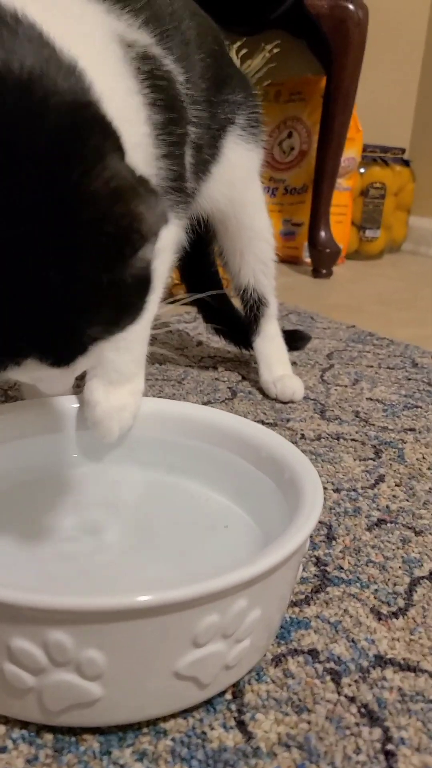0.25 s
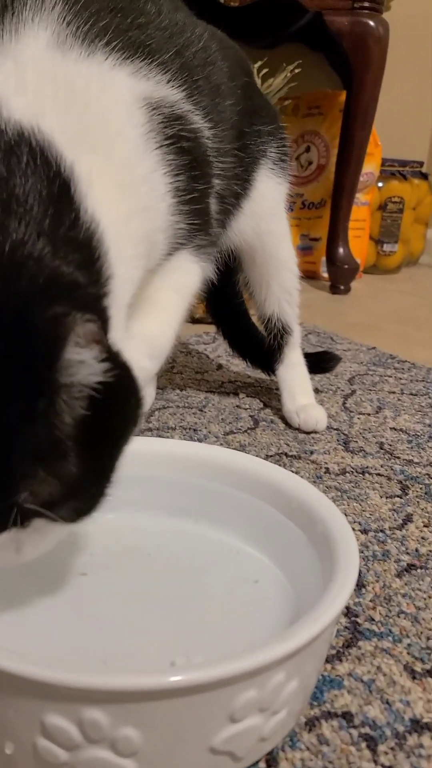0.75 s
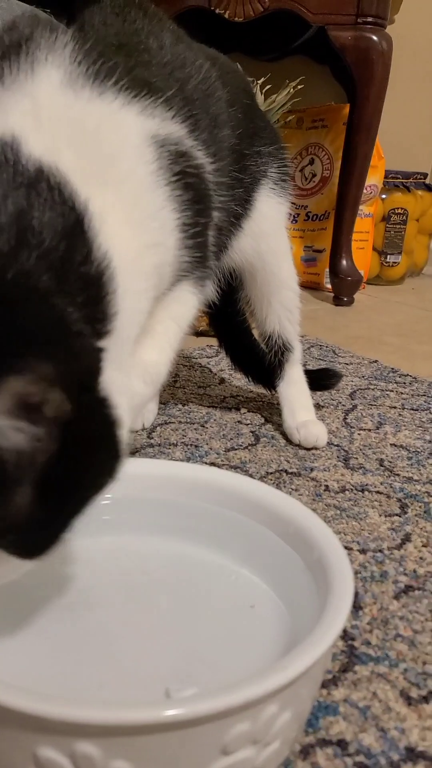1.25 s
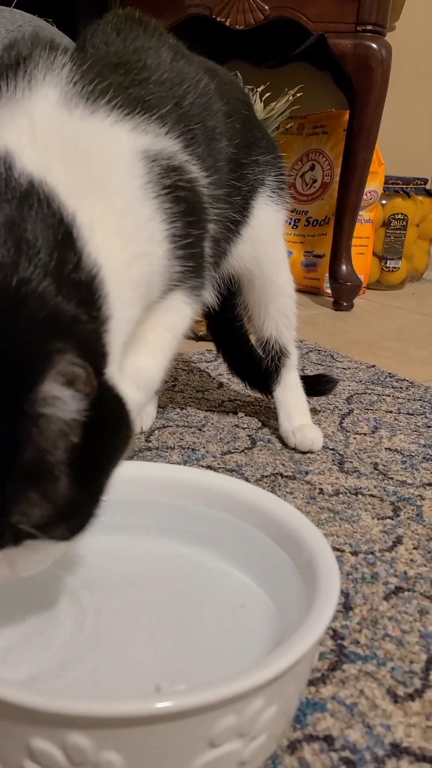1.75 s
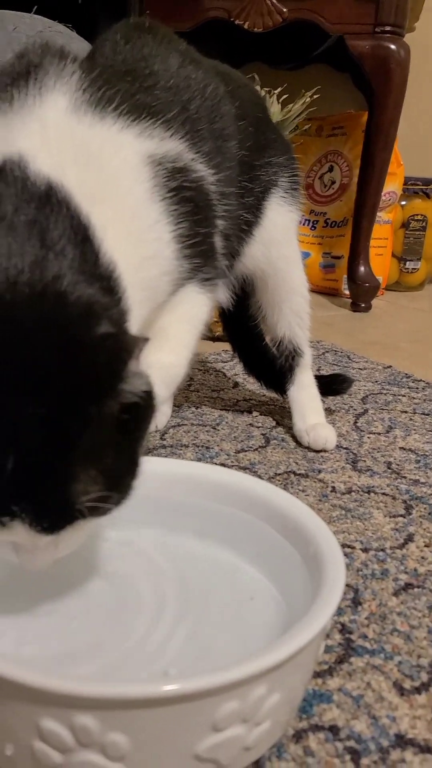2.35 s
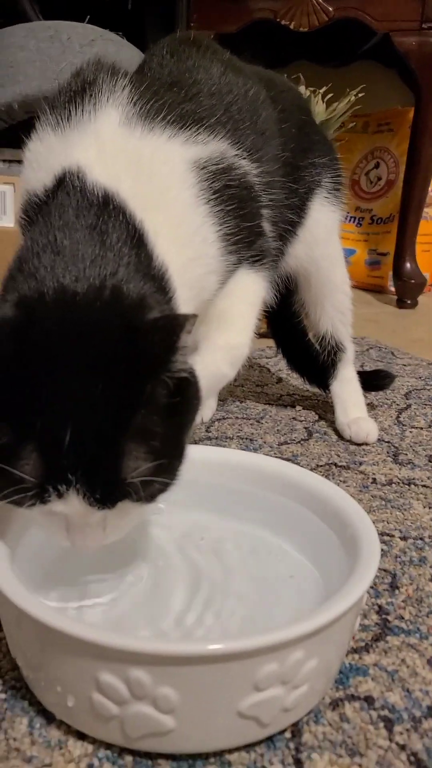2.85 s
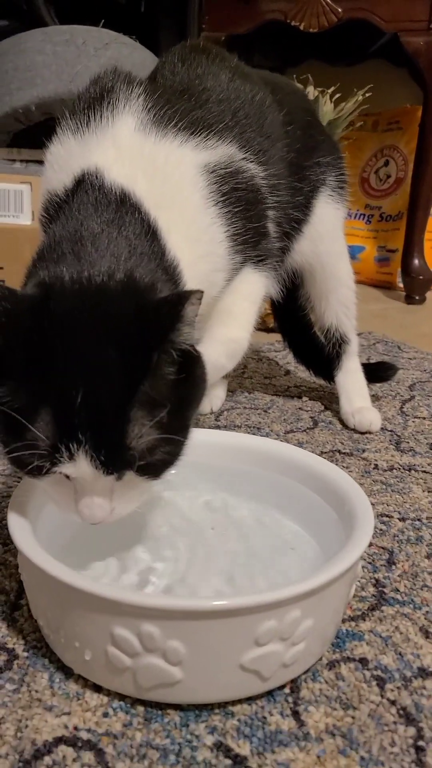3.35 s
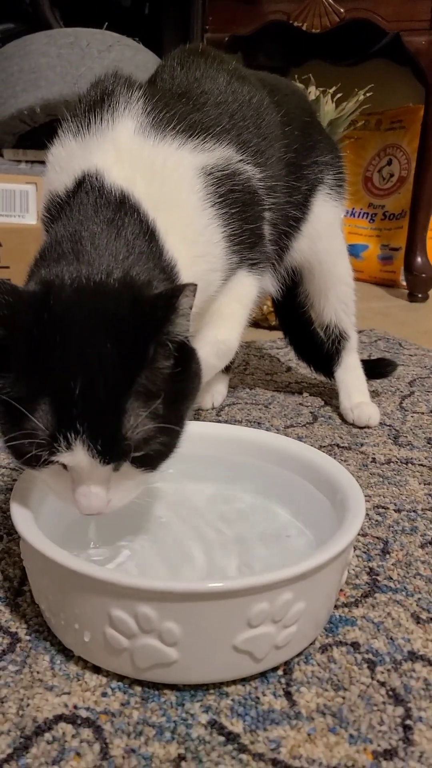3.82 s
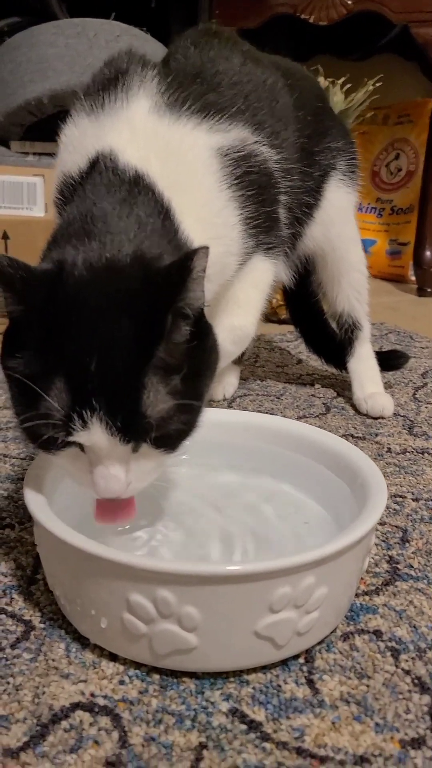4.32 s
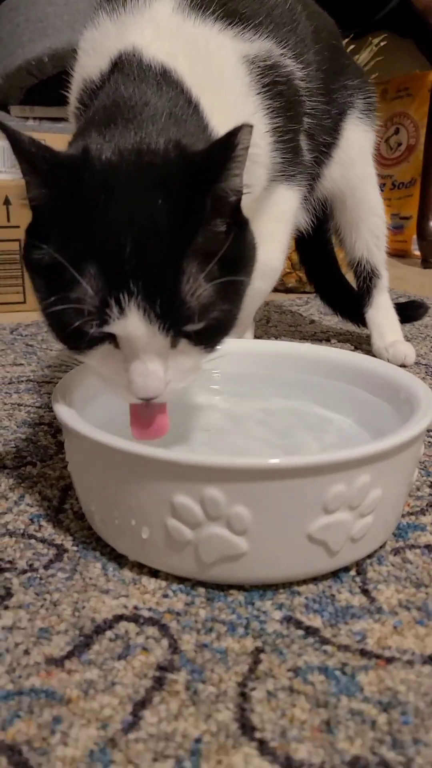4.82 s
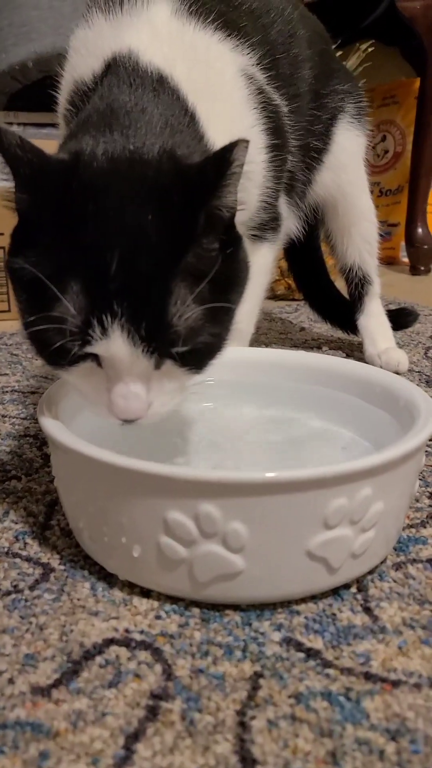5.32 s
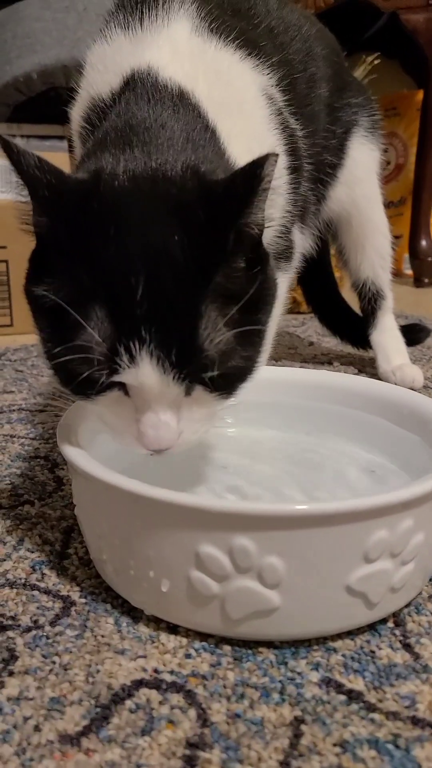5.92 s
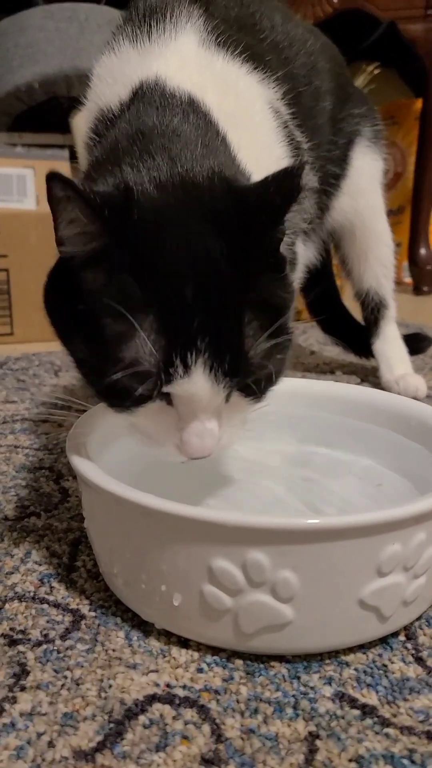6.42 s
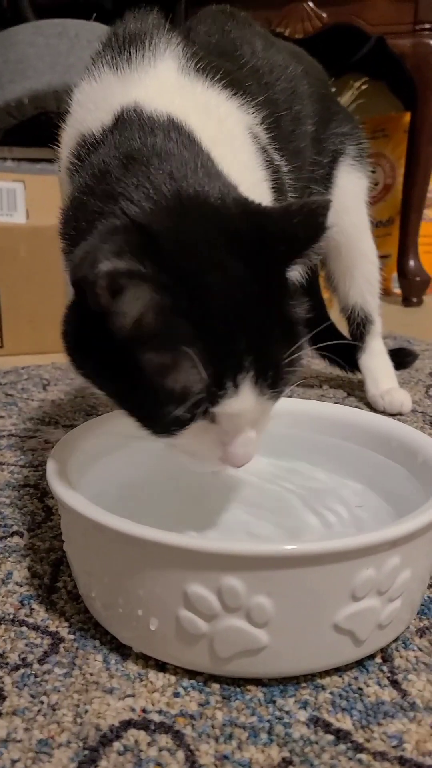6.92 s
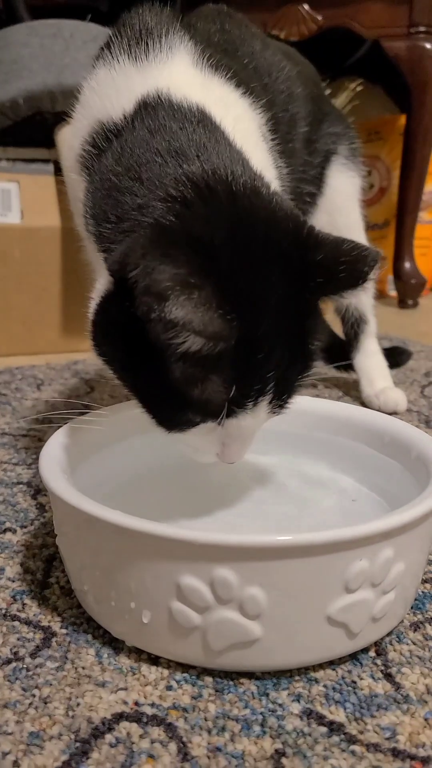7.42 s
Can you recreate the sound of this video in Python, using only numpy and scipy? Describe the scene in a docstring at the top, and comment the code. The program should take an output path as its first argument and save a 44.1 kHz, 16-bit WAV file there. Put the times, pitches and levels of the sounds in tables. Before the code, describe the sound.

A low, steady appliance hum with a soft rumble and faint hiss fills a quiet room throughout. Close to the microphone, a cat laps water from a ceramic bowl. The first soft wet clicks are sparse, at about 0.2, 1 and 1.6 seconds, then come more often. From about 3 seconds the drinking is busier, roughly three uneven laps a second: short tongue smacks mixed with tiny high bubble pops, drips, fine spatter and small sloshes. Each rings very briefly in the bowl, with a slight room echo. At about 4.3 seconds a faint motor starts, swells and settles into the background hum. The strongest smacks fall between 4.7 and 6.7 seconds, still small and delicate. The lapping stops around 7 seconds, leaving the hum and one last faint lick at about 7.5 seconds.

```python
"""Cat lapping water

A cat laps from a ceramic bowl on a carpet, about three laps a second, close to a phone.
Tongue smacks, drops and tiny bursting bubbles are brief damped rings that echo in bowl and room.
Appliances hum and the air of the room hisses softly underneath."""
import sys
import numpy as np
from scipy import signal
from scipy.fft import rfft, irfft, next_fast_len
from scipy.io import wavfile
from scipy.ndimage import uniform_filter1d

SR = 44100
rng = np.random.default_rng(int(sys.argv[2]) if len(sys.argv) > 2 else 0)


def transcribe(u):
    """Save the signal u as a 16-bit wav file named by the first command-line argument.

    u: samples, shape (n,) or (channels, n), limited to [-1, 1]; the rate is SR.
    q: integer samples, one column per channel.
    """
    v = np.clip(np.atleast_2d(u).T, -1, 1)
    q = np.round(v * 32767).astype(np.int16)
    wavfile.write(sys.argv[1], SR, q)


N = 337982
T = np.arange(N) / SR
TOP_HZ = 15750
MOTOR_START_S, MOTOR_RISE_S = 4.3, 0.51


def undb(db):
    """Decibels to gain."""
    return 10 ** (np.asarray(db) / 20)


def ramp(start_s, length_s):
    """Linear rise from 0 to 1, then hold."""
    return np.clip((T - start_s) / length_s, 0, 1)


def drift(rate_hz):
    """Smooth random curve, unit spread."""
    hold = int(SR / rate_hz)
    steps = np.repeat(rng.standard_normal(N // hold + 1), hold)
    curve = uniform_filter1d(uniform_filter1d(steps, hold), hold)[:N]
    return curve / curve.std()


def over_log_hz(table, hz, column=1):
    """Table column interpolated over log frequency."""
    rows = np.array(table)
    return np.interp(np.log(hz + 1), np.log(rows[:, 0]), rows[:, column])


def band_noise(samples, lo_hz, hi_hz):
    """Gently band-passed white noise."""
    sos = signal.butter(2, [lo_hz, min(hi_hz, SR / 2 - 1000)], "band", fs=SR, output="sos")
    return signal.sosfilt(sos, rng.standard_normal(samples))


def add(out, at_s, sound, pan_db):
    """Mix a sound in; pan is left minus right."""
    start = int(np.clip(at_s * SR, 0, N - 1))
    sides = undb(np.array([[pan_db], [-pan_db]]) / 2)
    out[:, start:start + len(sound)] += sides / np.sqrt(np.mean(sides ** 2)) * sound[:N - start]


# Air noise, stereo likeness: f/Hz, correlation
AIR_CORRELATION = [(20, 1), (150, 0.92), (260, 1), (500, 0.53), (1000, -0.37), (2000, -0.24), (6000, 0.14),
                   (15000, -0.29)]
# Air noise, resonances: f/Hz, width/Hz, left gain/dB, right gain/dB
AIR_RESONANCES = [(177.3, 11.5, 13, 10), (399.5, 8.7, -9, 6.5), (1194, 310, 3.5, 2.5), (2997, 175, 7, 5.5),
                  (6120, 980, 11, 7.5)]
# Air noise, base density: f/Hz, left level/dB, right level/dB
AIR_SPECTRUM = [(16.5, -91, -102.5), (47.3, -81.5, -80.5), (89.5, -82.5, -78), (141.3, -79, -73.5),
                (173, -89, -86.5), (263, -87, -82), (337, -90, -88), (539, -99, -93.5), (990, -102, -100),
                (3450, -107, -108), (7600, -109, -112), (8600, -118, -123), (9350, -122, -122),
                (10470, -117, -116), (16700, -123, -122)]
def air(rumble_hz=85, rush_hz=1100):
    """Room noise: a slowly swelling rumble, a low rush that grows with the motor, a steady hiss."""
    size = next_fast_len(N, True)
    hz = np.arange(size // 2 + 1) * SR / size
    correlation = over_log_hz(AIR_CORRELATION, hz)
    white = rfft(rng.standard_normal((2, size))) * np.sqrt(SR) / 2
    mid, side = white * np.sqrt([1 + correlation, 1 - correlation])
    db = np.array([over_log_hz(AIR_SPECTRUM, hz, column) for column in (1, 2)])
    for centre_hz, width_hz, left_db, right_db in AIR_RESONANCES:
        bell = 2 ** -(2 * (hz - centre_hz) / width_hz) ** 2
        db += np.array([[left_db], [right_db]]) * bell
    spectrum = np.array([mid + side, mid - side]) * undb(db)
    low, low_mid = (1 / (1 + (hz / edge_hz) ** 4) for edge_hz in (rumble_hz, rush_hz))
    shares = low, low_mid - low, 1 - low_mid
    rumble, rush, hiss = (irfft(spectrum * share, size)[:, :N] for share in shares)
    rumble *= undb(4.5 + 1.6 * drift(1.55))
    rush *= undb(-0.67 + 2 * ramp(MOTOR_START_S, MOTOR_RISE_S))
    return rumble + rush + hiss


# Appliance tones: f/Hz, left level/dB, right level/dB
HUM_TONES = [(43, -66.5, -63.5), (58.26, -59.5, -56), (119.4, -43.5, -41.5), (240.3, -68.5, -60.5),
             (362.4, -77, -66.5), (467.2, -72, -72)]
def hum(waver_db=0.35):
    """Mains and shaft tones, each wavering slightly in level."""
    out = np.zeros((2, N))
    for hz, left_db, right_db in HUM_TONES:
        tone = np.sin(2 * np.pi * (hz * T + rng.random()))
        out += undb([[left_db], [right_db]]) * tone * undb(waver_db * drift(3.08))
    return out


def motor(shaft_hz=204.4, base_db=-63, surge_db=10, settle_s=0.78, octave_db_per_s=4):
    """A motor starts, surges and settles; its speed wanders and its octave keeps growing."""
    phase = 2 * np.pi * np.cumsum(shaft_hz + 0.7 * drift(5)) / SR
    running_s = np.maximum(T - MOTOR_START_S, 0)
    shaft = undb(surge_db * np.exp(-running_s / settle_s)) * np.sin(phase)
    octave = undb(-15.5 + octave_db_per_s * running_s) * np.sin(2 * phase)
    gain = ramp(MOTOR_START_S, MOTOR_RISE_S) * undb(base_db + 1.2 * drift(2.96))
    return undb([[-1.5], [1.5]]) * gain * (shaft + octave)


# Room decay by octave band: f/Hz, t60/s
ROOM_DECAY = [(700, 0.19), (1500, 0.17), (3000, 0.42), (6000, 0.18), (12000, 0.052)]
def echoes(water, bowl_db=-9, bowl_t60_s=0.18, room_db=-8):
    """Quick reflections between bowl, water and head, then the soft tail of the room."""
    t = T[:SR // 2]
    out = []
    for channel in water:
        taps = rng.standard_normal(len(t)) * (rng.random(len(t)) < 0.12)
        taps *= undb(-60 * t / bowl_t60_s) * (t > 0.0012)
        tail = sum(band_noise(len(t), hz / np.sqrt(2), hz * np.sqrt(2)) * undb(-60 * t / t60_s)
                   for hz, t60_s in ROOM_DECAY)
        tail *= t > 0.005
        near = signal.oaconvolve(channel, undb(bowl_db) * taps / np.linalg.norm(taps))
        far = signal.oaconvolve(water.mean(axis=0), undb(room_db) * tail / np.linalg.norm(tail))
        out.append((near + far)[:N])
    return np.array(out)


# Modes of the filled bowl: f/Hz, t60/s, gain/dB
BOWL_MODES = [(1259, 0.074, 4.5), (1450, 0.42, -9.5), (1850, 0.24, -14), (2025, 0.095, 7.5),
              (2760, 0.23, -15), (10800, 0.13, 10), (11800, 0.12, 3)]
def bowl(water):
    """The water sounds ring the bowl; each side hears the modes in its own phase."""
    t = T[:SR // 2]
    response = np.zeros((2, len(t)))
    for hz, t60_s, db in BOWL_MODES:
        decay_per_s = np.log(1000) / t60_s
        envelope = undb(db) * 2 * decay_per_s / SR * np.exp(-decay_per_s * t)
        response += envelope * np.sin(2 * np.pi * (hz * t + rng.random((2, 1)) / 2))
    return signal.oaconvolve(water, response, axes=1)[:, :N]


def plip(hz, tau_cycles, glide=0.0024):
    """An air pocket rings, peaking at twice tau; its pitch rises as it nears the surface."""
    cycles = np.arange(int(12 * tau_cycles * SR / hz) + 2) * hz / SR
    age = cycles / tau_cycles
    envelope = (age / 2) ** 2 * np.exp(2 - age)
    return envelope * np.sin(2 * np.pi * (cycles - 2 * tau_cycles) * (1 + glide * (age - 2)))


def splash(lo_hz, hi_hz, rise_s, t60_s=0.05):
    """A water film tears: a brief band of noise."""
    t = T[:SR // 12]
    noise = band_noise(len(t), lo_hz, hi_hz)
    envelope = np.minimum(t / rise_s, 1) * undb(-60 * np.maximum(t - rise_s, 0) / t60_s)
    return envelope * noise / noise.std()


def fizz(count=50, below_db=27, follow=0.55, mean_life_s=0.056, centre_hz=11800):
    """Each smack leaves fine foam that bursts soon after; harder smacks leave louder foam."""
    out = np.zeros((2, N))
    hardest_db = max(row[1] for row in TONGUE_SMACKS)
    for at_s, db, *_ in TONGUE_SMACKS:
        foam_db = hardest_db - below_db + follow * (db - hardest_db)
        for wait, pitch, faintness, side in rng.random((count, 4)):
            life_s = -mean_life_s * np.log(1 - wait)
            bubble = plip(centre_hz * np.exp(0.22 * (2 * pitch - 1)), tau_cycles=1)
            add(out, at_s + life_s, undb(foam_db - 12 * faintness) * bubble, pan_db=6 * (2 * side - 1))
    return out


def spatter(count=340, top_db=-58, db_per_octave=-0.75, idle_db=-15):
    """Tiny ticks of the wet tongue, loudest during the bout of steady drinking."""
    out = np.zeros((2, N))
    for when, pitch, ring, faintness, side in rng.random((count, 5)):
        octaves = 3.7 * pitch
        tick = plip(1000 * 2 ** octaves, tau_cycles=0.25 + ring / 2)
        db = top_db - 10 * faintness + db_per_octave * octaves
        add(out, when * N / SR, undb(db) * tick, pan_db=5 * (2 * side - 1))
    drinking = ramp(start_s=2.6, length_s=1.9) - ramp(start_s=7.0, length_s=0.15)
    return out * undb(idle_db * (1 - drinking))


# Sloshes: t/s, length/s, mean bubble level/dB, centre f/Hz
SLOSH_CLUSTERS = [(0.247, .056, -76, 6600), (1.128, .03, -76, 7100), (1.629, 0.054, -70, 2520),
                  (1.944, 0.041, -73, 2510), (3.757, 0.047, -75, 2140), (4.322, 0.061, -69.5, 2600),
                  (4.696, 0.025, -67, 5040), (5.018, 0.059, -71.5, 2670), (5.474, .088, -72, 10500),
                  (6.142, .03, -69.5, 4760), (6.316, 0.052, -66.5, 2100), (6.773, .084, -68.5, 6460),
                  (6.804, .3, -79, 12000)]
def sloshes(count=70, pitch_scatter=0.244, range_db=6):
    """Water sloshes as the tongue draws back: clusters of small bubbles of like size."""
    out = np.zeros((2, N))
    for at_s, length_s, db, hz in SLOSH_CLUSTERS:
        for (when, pitch, side), size in zip(rng.standard_normal((count, 3)), rng.random(count) - 0.5):
            bubble = plip(min(hz * np.exp(pitch_scatter * pitch), TOP_HZ), tau_cycles=1.4)
            add(out, at_s + when * length_s / 3, undb(db + range_db * size) * bubble, pan_db=4 * side)
    return out


# Trapped bubbles: t/s, level/dB, start f/Hz, t60/s
TRAPPED_BUBBLES = [(.991, -62, 2040, 0.14), (1.624, -64, 2420, .1), (3.724, -58.5, 2040, 0.087),
                   (3.741, -64, 2090, 0.092), (4.78, -59, 1430, 0.16), (5.071, -56, 1780, .07),
                   (6.02, -65, 2050, 0.13), (6.137, -59, 4450, .07)]
def bubbles(glide_per_s=0.2):
    """A bubble under the surface rings as one note, creeping up in pitch."""
    out = np.zeros((2, N))
    t = T[:SR // 4]
    for at_s, db, hz, t60_s in TRAPPED_BUBBLES:
        tone = np.sin(2 * np.pi * hz * t * (1 + glide_per_s * t))
        add(out, at_s, undb(db - 60 * t / t60_s) * tone, pan_db=-3)
    return out


# Bubbles bursting at the surface: t/s, level/dB, f/Hz, pan/dB
SURFACE_POPS = [(.2423, -52, 7300, 13), (1.112, -56, 7200, 12), (2.204, -55, 4630, -7),
                (2.6295, -55, 5600, -4), (2.725, -59, 10450, -9), (2.9253, -60, 11730, -13),
                (3.1537, -47.5, 4660, -5), (3.203, -49.5, 6700, -4), (3.31, -50.5, 6200, -6),
                (3.3497, -48.5, 3870, -9), (3.356, -45, 4770, -6), (3.4126, -51.5, 6240, -4),
                (3.508, -50, 7200, -6), (3.606, -48.5, 6650, -10), (3.7285, -50.5, 6030, -4),
                (3.778, -53, 4150, -12), (3.7938, -50, 4630, -4), (4.1397, -53, 4300, -9),
                (4.1458, -45.5, 5130, -11), (4.372, -61, 12500, -12), (4.4028, -52.5, 4230, -7),
                (4.465, -42, 11300, -14), (4.594, -57, 13400, -5), (4.6867, -48, 4380, -4),
                (5.4068, -53, 10400, 8), (5.705, -60, 11400, 0), (6.019, -47, 11900, 2),
                (6.125, -43, 5200, 5), (6.396, -52, 6170, 8), (6.634, -56, 10900, -6),
                (6.743, -50, 7360, 14), (6.75, -52, 7800, 12), (6.8705, -56.5, 14310, 11),
                (6.969, -47.5, 7500, 12)]
def pops(splash_db=-15, lead_s=0.003):
    """The skin of a small bubble tears, then its cavity rings for a few cycles."""
    out = np.zeros((2, N))
    for at_s, db, hz, pan_db in SURFACE_POPS:
        tear = splash(hz / 2, hz * 1.22, rise_s=lead_s)
        add(out, at_s - lead_s, undb(db + splash_db) * tear, pan_db)
        add(out, at_s, undb(db) * plip(hz, tau_cycles=1.294), pan_db)
    return out


# Tongue hitting the water: t/s, level/dB, f/Hz, tau/cycles
TONGUE_SMACKS = [(.227, -50.5, 2260, 0.42), (.9896, -49, 1740, 0.66), (1.256, -56.5, 1650, 0.37),
                 (1.6228, -49, 2100, .55), (1.8384, -55, 1600, .3), (1.9247, -53.5, 1990, 0.32),
                 (2.253, -50.5, 2060, 0.22), (2.34, -52.5, 1160, 0.47), (2.5795, -54, 1700, 0.3),
                 (2.695, -55, 1050, .4), (3.1875, -45, 1320, 0.32), (3.427, -48, 1500, 0.22),
                 (3.586, -56, 2520, 0.72), (3.993, -59, 1100, .4), (4.1031, -48.5, 1050, 0.16),
                 (4.4646, -50, 1000, 0.41), (4.4791, -52.5, 2180, .6), (4.678, -49, 2040, 0.84),
                 (4.7772, -41.5, 1300, 0.68), (4.9937, -52, 2130, 0.32), (5.0678, -41.5, 1290, 0.35),
                 (5.0697, -50, 1400, 0.52), (5.391, -53, 1990, 0.47), (5.4067, -41.5, 1390, .24),
                 (5.5525, -54, 1130, .4), (5.6127, -49, 2930, .3), (5.7601, -51.5, 880, 0.34),
                 (5.8576, -58, 2530, .8), (5.9443, -52, 1844, 0.3), (6.0136, -46.5, 2030, 0.31),
                 (6.281, -47.5, 2530, 0.33), (6.6328, -41, 2460, .25), (6.8085, -55, 2700, .9),
                 (6.968, -47, 1400, 0.37), (7.4904, -57, 1130, .5)]
def smacks(splash_db=-15, lead_s=0.00303, thud_hz=780, thud_db=-15, pan_db=-4.5):
    """The tongue slaps an air pocket shut, with a splash and a soft thud from the mouth."""
    out = np.zeros((2, N))
    for at_s, db, hz, tau_cycles in TONGUE_SMACKS:
        thud = plip(thud_hz * np.exp(0.3 * rng.standard_normal()), tau_cycles=0.6)
        tear = splash(hz / 2.4, hz * 1.49, rise_s=lead_s)
        add(out, at_s - lead_s, undb(db + splash_db) * tear, pan_db)
        add(out, at_s, undb(db) * plip(hz, tau_cycles), pan_db)
        add(out, at_s, undb(db + thud_db) * thud, pan_db)
    return out


def scene(low_cut_hz=350):
    """Lapping, bowl and echoes over the background of the home."""
    low_cut = signal.butter(2, low_cut_hz, "high", fs=SR, output="sos")
    water = signal.sosfilt(low_cut, smacks() + pops() + spatter() + fizz() + sloshes())
    return water + bubbles() + bowl(water) + echoes(water) + hum() + motor() + air()


def record(dry, notch_hz=8750, width_hz=1400, depth=0.48):
    """The microphone port swallows a band of treble, and the phone cuts the top."""
    port_band = signal.lfilter(*signal.iirpeak(notch_hz, notch_hz / width_hz, fs=SR), dry)
    top_cut = signal.ellip(10, 0.1, 70, TOP_HZ, fs=SR, output="sos")
    return signal.sosfilt(top_cut, dry - depth * port_band)


dry = scene()
out = record(dry)
transcribe(out)
```